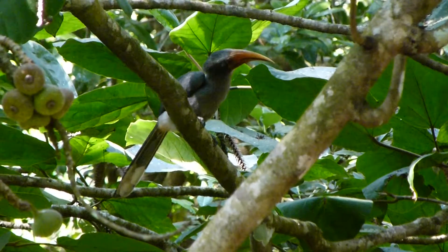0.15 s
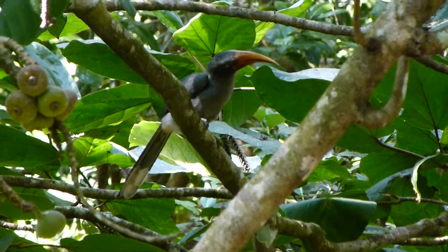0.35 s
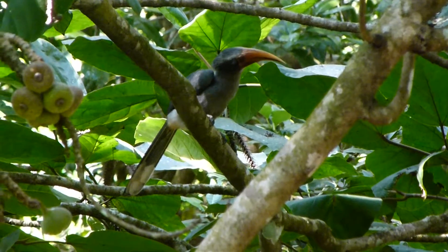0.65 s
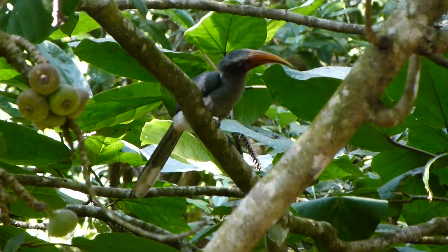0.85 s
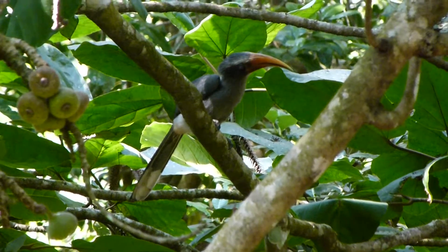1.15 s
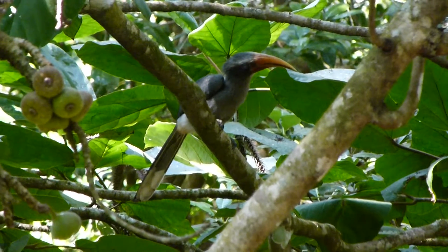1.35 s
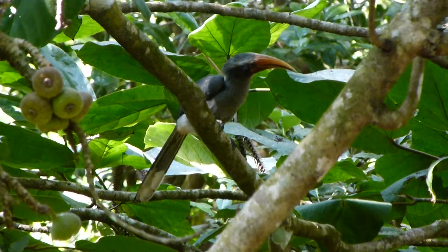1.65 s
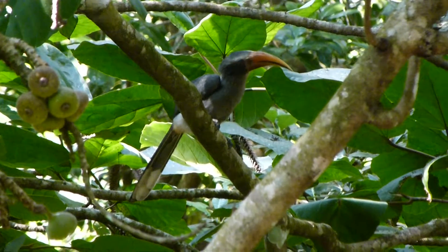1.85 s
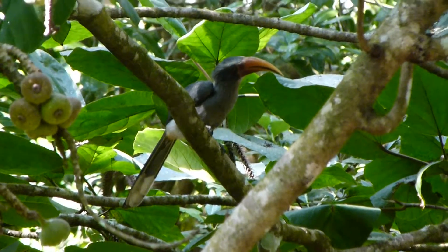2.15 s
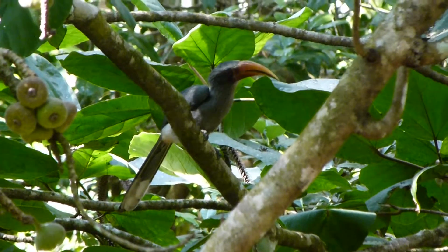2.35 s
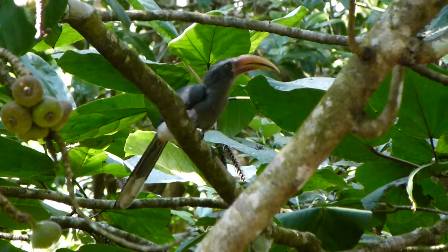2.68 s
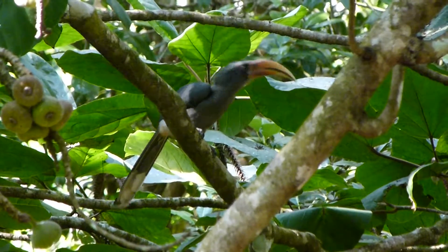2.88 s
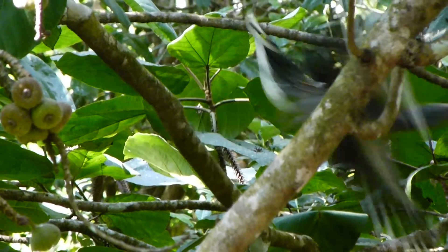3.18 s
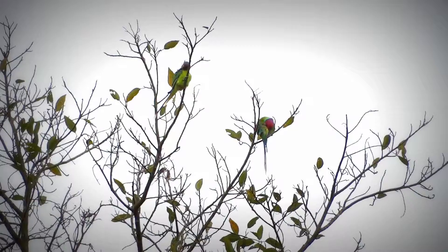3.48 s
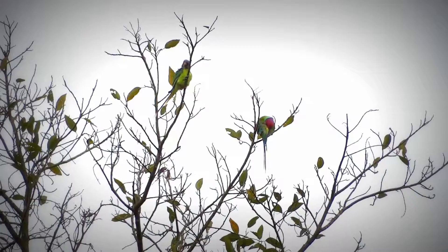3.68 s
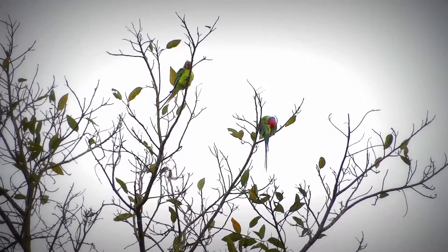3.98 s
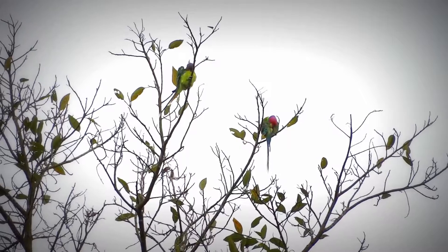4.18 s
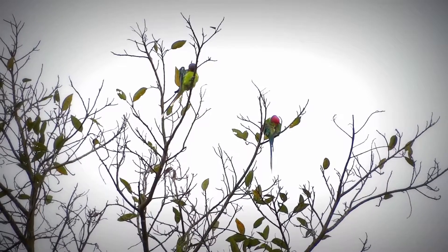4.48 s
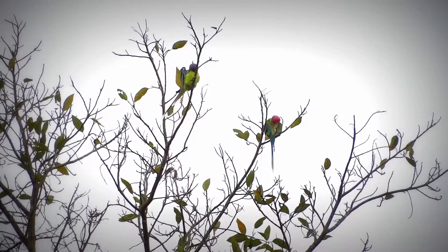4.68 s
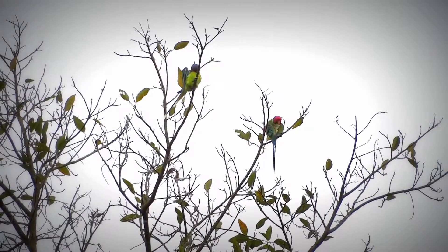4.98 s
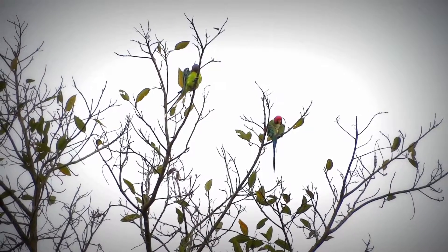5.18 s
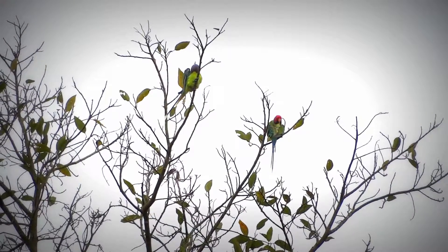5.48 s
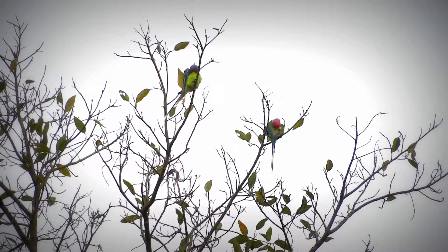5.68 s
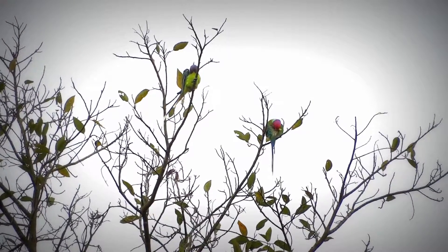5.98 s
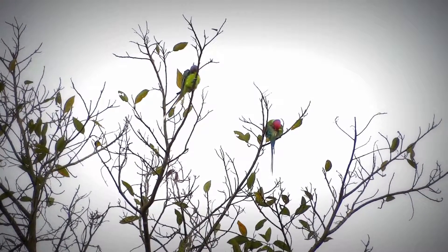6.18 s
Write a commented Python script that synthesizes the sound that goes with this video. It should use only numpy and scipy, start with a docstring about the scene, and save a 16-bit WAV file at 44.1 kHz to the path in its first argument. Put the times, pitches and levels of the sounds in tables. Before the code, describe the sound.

In a dense forest, birds squeal, whistle and repeat quick high chirps, echoing among trunks over a wash of leaves and far chatter. A low warble runs by and a branch snaps back as a bird leaves. After a split second of silence, a quieter open clearing follows: distant birds call and two crickets trill in short bursts, while the hand-held microphone ticks, knocks and rumbles softly.

```python
"""A dense forest, then a quieter, more open clearing. In the forest, birds squeal in rasping overtones
and whistle, chirp and warble in gliding near-sines; the calls echo among trunks over far chatter and
leaves, and a branch snaps back. After a short silence a second microphone opens in the clearing:
distant birds call, two crickets trill in bursts of wing strokes, and the hand-held body ticks,
knocks and rumbles."""
import sys
import numpy as np
from scipy import signal
from scipy.fft import rfft, irfft
from scipy.io import wavfile
from scipy.ndimage import uniform_filter1d

SR = 44100
rng = np.random.default_rng(int(sys.argv[2]) if len(sys.argv) > 2 else 0)


def generate_wav(signal):
    """Clip the signal to [-1, 1] and save it as 16-bit WAV at the path in sys.argv[1]."""
    frames = np.transpose(np.atleast_2d(signal))
    scaled = np.clip(frames, -1, 1) * 32767
    pcm = np.round(scaled).astype(np.int16)
    wavfile.write(sys.argv[1], SR, pcm)


N = 279594
LEAD = SR // 4  # samples before t = 0, so earlier calls still ring
FOREST_END_S, CLEARING_START_S = 3.4225, 3.480
SIDE_SIGN = np.array([[1], [-1]])


def undb(db):
    return 10 ** (np.asarray(db) / 20)


def set_rms(x, db):
    return x * undb(db) / np.sqrt(np.mean(x ** 2))


def silence():
    return np.zeros((2, LEAD + N))


def add(out, start_s, sound, pan_db):
    """Mix in a sound; pan_db is left minus right, and left lags one sample."""
    for channel, (lag, pan_share) in enumerate(((1, .25), (0, -.75))):
        i = int(start_s * SR) + LEAD + lag
        n = min(len(sound), out.shape[1] - i)
        out[channel, i:i + n] += sound[:n] * undb(pan_db * pan_share)


def glide(length_s, first_hz, mid_hz, last_hz):
    """Position 0-1 in a note and its pitch, a parabola through three points."""
    u = np.arange(int(length_s * SR)) / int(length_s * SR)
    return u, first_hz * (1 - u) * (1 - 2 * u) + 4 * mid_hz * u * (1 - u) + last_hz * u * (2 * u - 1)


def phasor(hz):
    return np.exp(2j * np.pi * np.cumsum(hz) / SR)


def wobble(width_hz, size):
    """Complex narrowband noise, rms 1."""
    pole = np.exp(-np.pi * width_hz / SR)
    z = rng.standard_normal(size + 2000) + 1j * rng.standard_normal(size + 2000)
    for _ in range(2):
        z = signal.lfilter([1 - pole], [1, -pole], z)
    return z[-size:] / np.sqrt(np.mean(abs(z[1000:]) ** 2))


def drift(rate_hz):
    """Random steps, smoothed twice."""
    hold = int(SR / rate_hz)
    steps = np.repeat(rng.standard_normal(N // hold + 1), hold)
    return 0.86 * uniform_filter1d(uniform_filter1d(steps, hold), hold)[:N]


def lookup(curve, hz):
    """Interpolate over log frequency."""
    knots_hz, values = np.transpose(curve)
    return np.interp(np.log(hz), np.log(knots_hz), values)


# background spectra: f/Hz, relative density/dB
FOREST_SPECTRUM = [(18, -56), (30, -24.5), (160, -23.5), (284, -7), (455, -8.5), (709, 1), (808, -5),
                   (1080, -2), (5740, -8), (15500, -24)]
CLEARING_SPECTRUM = [(18, -28), (30, -1), (675, -5), (2440, -15), (2900, -8.5), (4750, -9), (5650, -15),
                     (6390, -14.5), (11000, -12), (14300, -43), (22000, -120)]
# left-right coherence: f/Hz, coherence/0-1
FOREST_COHERENCE = [(300, 0.8), (700, 0.34), (15000, 0)]
CLEARING_COHERENCE = [(60, 1), (500, 0.041), (3000, 1)]


def background(spectrum, coherence, db, drift_db, flicker_db):
    """Far leaves and voices: a steady wash whose half-octave noise bands each flicker, less on top."""
    hz = np.maximum(np.arange(N // 2 + 1) * SR / N, 1)
    alike = lookup(coherence, hz)
    noise = rfft(rng.standard_normal((2, N))) * undb(lookup(spectrum, hz))
    mid, side = noise * np.sqrt([1 + alike, 1 - alike])
    stereo = mid + side * SIDE_SIGN
    out, tiny_drift = 0, drift_db * drift(2.75)
    for octave in np.arange(4, 14.5, .5):
        band = np.cos(np.pi * np.clip(np.log2(hz) - octave, -.5, .5)) ** 2
        flicker = flicker_db * np.clip((13.3 - octave) / 3.67, .25, 1) * drift(9)
        out = out + irfft(stereo * band, N) * undb(tiny_drift + flicker)
    return set_rms(out, db)


def whistle(length_s, first_hz, mid_hz, last_hz, db, flutter, octave_db=-23, lean=.76):
    """Near-sine with a weak octave; flutter is quicker on high notes, lean > 1 swells late."""
    u, hz = glide(length_s, first_hz, mid_hz, last_hz)
    fundamental = phasor(hz)
    tone = fundamental + undb(octave_db) * fundamental ** 2
    waver = (1 + flutter * wobble(.06 * mid_hz, len(u))) / np.hypot(1, flutter)
    envelope = np.sin(np.pi * u ** lean) ** .6
    return np.sqrt(2) * undb(db) * envelope * (tone * waver).imag


def far_chorus(start_s, end_s, db, low_hz, top_hz, count):
    """Faint whistles, random in time, pitch and side."""
    out = silence()
    for when, pitch, bend, span, fade, side in rng.random((count, 6)):
        hz = low_hz * (top_hz / low_hz) ** pitch
        first_hz = hz * (1.08 - 0.17 * bend)
        note = whistle(0.0532 + 0.1174 * span, first_hz, hz, hz, db - 8 * fade, flutter=0.95)
        add(out, start_s + when * (end_s - start_s), note, pan_db=8 * (side - .5))
    return out


def tree_echoes(dry, branch_db, trunk_db, trunk_t60_s, coherence):
    """Close branches smear the sound; farther trunks return a long tail. Drops the lead-in."""
    t = np.arange(SR) / SR
    out = dry
    for db, t60_s in ((branch_db, .12), (trunk_db, trunk_t60_s)):
        mid, side = rng.standard_normal((2, SR)) * 1000 ** (-t / t60_s)
        echoes = np.sqrt(1 + coherence) * mid + np.sqrt(1 - coherence) * side * SIDE_SIGN
        echoes /= np.sqrt(np.sum(echoes ** 2) / 2)
        out = out + undb(db) * signal.fftconvolve(dry, echoes, axes=1)[:, :LEAD + N]
    return out[:, LEAD:]


# throat response: f/Hz, gain/dB
THROAT = [(600, -42), (2050, -13), (2750, 4.5), (3300, 1.5), (4700, 3), (6500, -3.5), (8500, -12.5),
          (13500, -25.5)]
# squeals: t/s, length/s, first f/Hz, middle f/Hz, last f/Hz, level/dB
SQUEALS = [(-.07, 0.14, 688.4, 694.6, 682.6, -31.5), (0.313, .16, 1674, 1656, 1645, -37)]


def squeals():
    """Overtones of one pitch, weighted by the throat, each rasping on its own."""
    out, top_hz = silence(), THROAT[-1][0]
    for start_s, length_s, first_hz, mid_hz, last_hz, db in SQUEALS:
        u, hz = glide(length_s, first_hz, mid_hz, last_hz)
        tone = 0
        for k in range(1, int(top_hz / first_hz)):
            rasp = 1 + .9 * wobble(60 + 0.032 * k * first_hz, len(u))
            tone = tone + undb(lookup(THROAT, k * hz)) * rasp * phasor(k * hz)
        add(out, start_s, set_rms(tone.imag, db) * np.sin(np.pi * u) ** 0.16, pan_db=-1.5)
    return out


# hoarse calls and rustle: t/s, length/s, centre f/Hz, width/Hz, level/dB
CHATTER = [(0, 0.25, 4536, 2400, -39.5), (0.097, 0.11, 4370, 503, -36), (0.785, 0.1, 1446, 153, -50),
           (1.003, 0.48, 7680, 599.5, -60), (1.297, 0.19, 1128, 160.7, -55.5),
           (1.642, 0.12, 1130, 195, -60.5), (1.799, 0.13, 1812, 160, -54), (2.606, 0.24, 2896, 2080, -44.5),
           (2.949, 0.44, 7370, 996, -49), (3.046, 0.37, 3346, 5100, -52), (3.673, 0.32, 5914, 2800, -54.5),
           (4.013, 0.046, 2216, 607, -54), (4.947, 0.21, 6110, 1800, -54.5), (5.267, 0.31, 4336, 3050, -56),
           (5.552, 0.14, 5470, 2000, -56), (5.752, 1, 6340, 250, -66), (6.12, 0.66, 4810, 600, -60)]


def chatter(coherence=0.99):
    """Calls too far or dense to resolve: noise bands that swell and fade."""
    out = silence()
    for start_s, length_s, centre_hz, width_hz, db in CHATTER:
        u, hz = glide(length_s, centre_hz, centre_hz, centre_hz)
        carrier = undb(db) * np.sin(np.pi * u) ** .5 * phasor(hz)
        mid, side = ((carrier * wobble(width_hz, len(u))).imag for _ in range(2))
        stereo = np.sqrt(1 + coherence) * mid + np.sqrt(1 - coherence) * side * SIDE_SIGN
        i = int(start_s * SR) + LEAD
        out[:, i:i + len(u)] += stereo[:, :LEAD + N - i]
    return out


def arched(mid_hz, slide_hz, arch=0.0235):
    """First, middle and last pitch of a slide that bows upward."""
    ends_hz = mid_hz * (1 - arch)
    return ends_hz - slide_hz / 2, mid_hz, ends_hz + slide_hz / 2


# whistled notes: t/s, length/s, middle f/Hz, slide/Hz, level/dB
WHISTLES = [(0.046, 0.082, 1628, -1060, -36.5), (0.048, 0.051, 3790, -420, -33),
            (0.249, 0.065, 1779, -57, -43), (0.265, 0.19, 4716, -520, -35),
            (0.263, 0.18, 6437, -520, -37.5), (0.425, 0.083, 4260, -420, -31), (0.49, 0.11, 4454, -78, -35),
            (0.514, 0.085, 2406, 491, -45.5), (0.599, 0.054, 2465, -380, -41),
            (0.743, 0.13, 2726, 761.5, -44.5), (0.761, 0.1, 3307, 600, -42.5),
            (0.933, 0.06, 4986, 1056, -41), (0.967, 0.093, 2712, 88, -44.5), (0.983, 0.12, 5430, 45, -42),
            (1.107, 0.033, 1424, 261, -51), (1.564, 0.12, 1553, 136, -57), (1.582, 0.071, 3690, 30, -58),
            (1.674, 0.068, 2340, 57, -54.5), (1.72, 0.31, 2575, 7, -60), (1.864, 0.092, 1930, 122, -51),
            (2.36, 0.1, 2460, 423, -48.5), (2.378, 0.13, 3142, 400, -49), (2.461, 0.055, 2448, -310, -39),
            (2.595, 0.093, 1952, -14, -50.5), (2.658, 0.093, 2860, 156, -51),
            (2.699, 0.15, 5310, -1950, -41.5), (2.922, 0.036, 1008, -150, -41.5),
            (3.014, 0.086, 923, -220, -46.5), (3.029, 0.082, 2696, 30, -46),
            (3.099, 0.049, 1590, -280, -45), (3.13, 0.031, 1830, -120, -49),
            (3.28, 0.091, 730, -400, -47.5), (3.571, 0.26, 3717, -630, -60),
            (3.899, 0.058, 2744, 304, -54.5), (3.959, 0.064, 2790, 80, -57.5),
            (4.273, 0.14, 2760, 60, -53.5), (4.371, 0.048, 2210, 360, -55.5),
            (4.418, 0.048, 2140, -400, -54.5), (5.447, 0.26, 2950, 30, -68), (5.919, 0.18, 1386, 8, -67.5)]


def whistlers():
    """Single sliding notes: scattered in the forest, to the right in the clearing."""
    out = silence()
    pans_db = rng.normal(-.6, 2, len(WHISTLES))
    for (start_s, length_s, hz, slide_hz, db), pan_db in zip(WHISTLES, pans_db):
        note = whistle(length_s, *arched(hz, slide_hz), db, flutter=0.71)
        add(out, start_s, note, pan_db if start_s < FOREST_END_S else -5)
    return out


# phrases: delay/s, length/s, first f/Hz, middle f/Hz, last f/Hz, relative level/dB
CHIRP_NOTES = [(-.004, 0.0064, 6400, 7200, 7950, -7), (0, 0.014, 5070, 5730, 6000, 3.5),
               (.012, 0.042, 4040, 4786, 5070, 2.5), (.044, 0.026, 4210, 4093, 3955, 2),
               (.068, 0.018, 3886, 3660, 3100, -6.5)]  # click, flick up, arch, hold, fall
PIP_NOTES = [(k * .053, 0.027, 3600, 3370, 3080, k * 1.9) for k in range(3)]  # one falling note three times, each louder
# calls: t/s, level/dB
CHIRP_CALLS = [(0.124, -38), (.988, -39), (1.227, -39.5), (2.061, -41), (2.862, -40.5)]
PIP_CALLS = [(4.402, -58), (5.672, -55)]


def songbird(notes, calls, pan_db):
    """A bird repeats one quick phrase of nearly pure notes."""
    out = silence()
    for start_s, db in calls:
        for delay_s, *contour, note_db in notes:
            note = whistle(*contour, db + note_db, flutter=0.39, octave_db=-32, lean=1.13)
            add(out, start_s + delay_s, note, pan_db)
    return out


def warble(start_s=3.054, step_s=0.04, base_hz=1193, db=-34.5):
    """A low run of falling notes that lifts near the third and dies away."""
    out = silence()
    for k in range(7):
        hz = base_hz * (1 + 0.0515 * np.exp(-((k - 2.3) / 1.2) ** 2))
        note = whistle(step_s, *arched(hz, slide_hz=-320), db - 0.3 * k ** 2, flutter=0.3)
        add(out, start_s + k * step_s, note, pan_db=-2.5)
    return out


def crack(db, t60_s=.028, band_hz=(500, 7000)):
    """Bright noise that dies at once."""
    t = np.arange(SR // 20) / SR
    burst = rng.standard_normal(len(t)) * 1000 ** (-t / t60_s)
    return undb(db) * signal.lfilter(*signal.butter(1, band_hz, "band", fs=SR), burst) / 2


def branch_snap(start_s=3.282):
    """A branch snaps back as a bird leaves."""
    out = silence()
    add(out, start_s, crack(db=-33), pan_db=0)
    return out


def hand_rumble(db=-58.5, fall_db_per_s=6.5, band_hz=(35, 160)):
    """Low, uneven mono handling noise; fades as the hand settles."""
    bandpass = signal.butter(2, band_hz, "band", fs=SR, output="sos")
    rumble = signal.sosfilt(bandpass, rng.standard_normal(N)) * undb(2 * drift(16))
    held_s = np.arange(N) / SR - CLEARING_START_S
    return set_rms(rumble, db) * undb(-fall_db_per_s * held_s)


# hits on the microphone body: t/s, level/dB
NAIL_TAPS = [(3.493, -22.5), (5.361, -30)]
BUMPS = [(3.749, -34), (3.769, -44), (5.361, -43), (5.382, -43)]


def body_knocks(modes_hz=(179, 262), t60_s=0.05):
    """A bump rings two low body modes; a fingernail ticks."""
    out, t = silence(), np.arange(SR // 10) / SR
    ring = sum(np.sin(2 * np.pi * hz * t) for hz in modes_hz) * 1000 ** (-t / t60_s)
    for start_s, db in BUMPS:
        add(out, start_s, undb(db) * ring, pan_db=0)
    for start_s, db in NAIL_TAPS:
        add(out, start_s, crack(db), pan_db=0)
    return out[:, LEAD:]


# wing-stroke bursts: t/s, level/dB
FAR_BURSTS = [(4.0 + k * .169, -57) for k in range(6)]  # quicker, steady beat
NEAR_BURSTS = [(4.031, -51.5), (4.2034, -49), (4.3885, -50), (4.575, -49.5), (4.7557, -48.5),
               (4.9466, -48.5), (5.1297, -48), (5.319, -48.5)]
WING_HZ = 5360


def cricket(wing_hz, bursts, strokes=6, stroke_s=0.0093, step_s=.0119, sag=0.098):
    """Each wing stroke is a short rough tone sagging in pitch; strokes grow through a burst."""
    out = silence()
    u, hz = glide(stroke_s, wing_hz, wing_hz * (1 - sag / 2), wing_hz * (1 - sag))
    stroke = np.sin(np.pi * u) * phasor(hz)
    for start_s, db in bursts:
        for k in range(strokes):
            rough = (stroke * (1 + .65 * wobble(300, len(u)))).imag
            add(out, start_s + k * step_s, rough * undb(db - 4 * .4 ** k), pan_db=-3.5)
    return out


def forest(birds):
    """Birds and branch among trunks, bass cut by the first microphone; dry snap and background added."""
    snap = branch_snap()
    chorus = far_chorus(-.2, FOREST_END_S, db=-58, low_hz=650, top_hz=6500, count=90)
    sources = birds + chorus + undb(5) * snap
    echoing = tree_echoes(sources, branch_db=-2.5, trunk_db=2, trunk_t60_s=.8, coherence=.5)
    bass_cut = signal.butter(3, 400, "high", fs=SR, output="sos")
    bed = background(FOREST_SPECTRUM, FOREST_COHERENCE, db=-45, drift_db=0.037, flicker_db=4.2)
    return signal.sosfilt(bass_cut, echoing) + snap[:, LEAD:] + bed


def clearing(birds):
    """Far birds, crickets and handling noise; the second microphone passes less treble."""
    chorus = far_chorus(CLEARING_START_S, N / SR, db=-70, low_hz=2500, top_hz=7000, count=60)
    near_cricket = cricket(WING_HZ, NEAR_BURSTS)
    far_cricket = cricket(.94 * WING_HZ, FAR_BURSTS)
    sources = birds + chorus + far_cricket + undb(-10) * near_cricket
    echoing = tree_echoes(sources, branch_db=-4, trunk_db=-1, trunk_t60_s=0.98, coherence=1)
    close = near_cricket[:, LEAD:] + body_knocks() + hand_rumble()
    bed = background(CLEARING_SPECTRUM, CLEARING_COHERENCE, db=-55, drift_db=0.03, flicker_db=3.8)
    treble_cut = signal.ellip(10, .2, 60, 10900, fs=SR, output="sos")
    return signal.sosfilt(treble_cut, echoing + close + bed)


def scene():
    """Forest, short silence, clearing."""
    birds = whistlers() + warble() + squeals()
    birds += songbird(CHIRP_NOTES, CHIRP_CALLS, pan_db=-6)
    birds += songbird(PIP_NOTES, PIP_CALLS, pan_db=-.3)
    birds += chatter()
    in_forest = np.arange(LEAD + N) < LEAD + FOREST_END_S * SR
    t = np.arange(N) / SR
    fade_out = np.clip((FOREST_END_S - t) / 0.0026, 0, 1)
    fade_in = np.clip((t - CLEARING_START_S) / 0.0079, 0, 1)
    return forest(birds * in_forest) * fade_out + clearing(birds * ~in_forest) * fade_in


def record(dry):
    """The right port is slightly more sensitive; the recorder cuts the top."""
    top_cut = signal.ellip(10, .2, 80, 15600, fs=SR, output="sos")
    return signal.sosfilt(top_cut, dry * undb([[-.4], [.4]]))


dry = scene()
out = record(dry)
generate_wav(out)
```